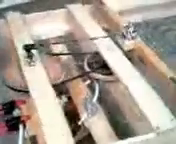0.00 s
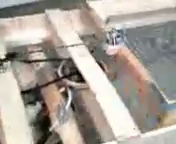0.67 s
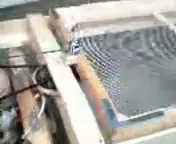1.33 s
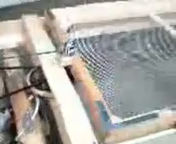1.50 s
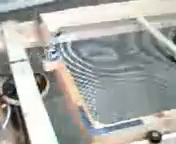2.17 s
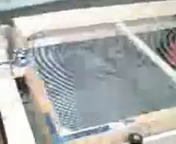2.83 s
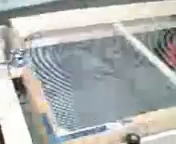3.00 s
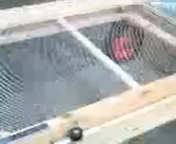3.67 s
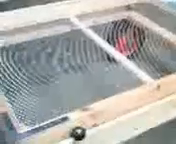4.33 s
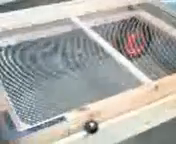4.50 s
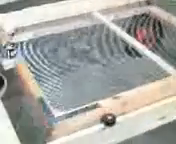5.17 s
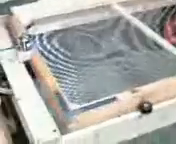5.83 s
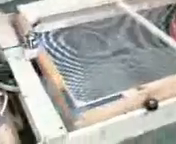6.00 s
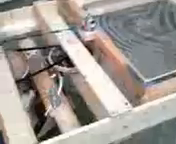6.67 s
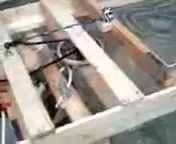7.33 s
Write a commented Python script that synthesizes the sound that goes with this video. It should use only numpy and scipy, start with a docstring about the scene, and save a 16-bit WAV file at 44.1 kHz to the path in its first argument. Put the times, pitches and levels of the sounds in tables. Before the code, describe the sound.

From the first moment, a loud motor drones close by outdoors, with a low, uneven throb that shakes a wooden frame. It drives a sieve tray back and forth at about four strokes a second. Each stroke combines a rumble of small wheels, a scrape along the rails and a rattle of wire mesh, followed immediately by a softer rebound. The drone comes back up in each tiny lull. The frame thumps now and then, most clearly around 0.3, 4.6, 5.7, 6.3 and 7 seconds. The tray clatters irregularly, notably near 1 second and between 3 and 4.4 seconds. It also catches on its rails in very short, squeaky judders, strongest near 1, 1.8, 3.8 and 5 to 5.5 seconds. Faint, bright clicks top some of the loudest strokes, though the overall treble is dull. The machine keeps its pace to the end, at about 7.4 seconds.

```python
"""A motor on a wooden frame outdoors cranks a soil sieve to and fro, four strokes a second.
From the start the motor drones through the frame, which shakes and now and then thumps.
On each stroke the tray rumbles on small wheels, scrapes its rails and rattles its wire mesh;
80 ms later it rebounds. At times it clatters, or sticks and judders on the rails. Faint, bright
clicks sound on some of the loudest peaks. In each lull the drone comes back up; it runs to the end."""
import sys
import numpy as np
from scipy import signal
from scipy.fft import rfft, irfft
from scipy.io import wavfile
from scipy.ndimage import uniform_filter1d, minimum_filter1d

SR = 44100
rng = np.random.default_rng(int(sys.argv[2]) if len(sys.argv) > 2 else 0)


def materialize(psi):
    """Save the field psi as 16-bit PCM at rate SR to the path in sys.argv[1].

    A 1-D psi becomes a single channel; in a 2-D psi each row is a channel.
    """
    bounded = np.clip(np.atleast_2d(psi).T, -1, 1)
    quanta = np.round(bounded * 32767).astype(np.int16)
    wavfile.write(sys.argv[1], SR, quanta)


N = 327663
TIME_S = np.arange(N) / SR

# frame shake spectrum: freq_hz, gain_db
SHAKE_SPECTRUM = [(15, -23), (30, -20.5), (60, -4), (100, -2.5), (170, 0.5), (240, 2), (400, 6), (700, -10),
                  (2000, -65)]
# wooden frame modes: freq_hz, width_hz, gain_db
FRAME_MODES = [(286, 120, -5), (340, 28, 5.5), (375.8, 29, -2.5)]
# harder knocks of the frame: peak_s, level_db
FRAME_THUMPS = [(.33, -16), (1.0, -19.5), (1.361, -16.5), (2.935, -20), (3.0, -19), (3.04, -23),
                (3.56, -18), (3.85, -16.5), (4.1, -17), (4.389, -17), (4.58, -15), (5.1, -19.5),
                (5.67, -15), (5.79, -20), (6.25, -13), (7.05, -14.5), (7.35, -18.5)]
# shaft speed: time_s, speed_hz
MOTOR_SPEED = [(0.0, 52.5), (0.06, 51.3), (0.99, 51.9), (2.69, 51.3), (2.96, 52.7), (3.02, 51.9),
               (4.51, 52.0), (4.63, 51.2), (5.03, 51.7), (6.58, 51.8), (6.66, 51.0), (6.81, 51.9),
               (7.08, 51.5), (7.43, 52.4)]
# motor's direct sound: time_s, nearness_db
MOTOR_NEARNESS = [(0, 0), (1.2, 3), (2.4, 1), (3.05, -2), (3.55, 0), (4.2, -4), (5.2, -2), (6.4, .5),
                  (7.43, 1)]
# motor hum: shaft_harmonic, level_db, nearness_db_per_db
HUM_PARTIALS = [(3, -28.5, 2.9), (4, -11.5, 2), (5, -4.5, 0.6), (6, -4, -0.5), (7, 2, 1.5), (8, -3, 1),
                (10, -11, 0.6), (11, -16.5, 1.5), (12, -16.5, 0.6)]
# pull and push in turn: peak_s, rumble_db, scrape_db, rattle_db, rebound_re_stroke_db
TRAY_STROKES = [(-0.005, -15, -13.5, -25, -32), (0.268, -16, -22, -34.5, -7.5),
                (0.491, -18, -19.5, -27, -3.5), (0.749, -13, -19, -30, -4.5),
                (0.969, -19.5, -17, -27, -11.5), (1.253, -12, -15, -26, -7.0),
                (1.464, -16, -16.0, -26, -13.5), (1.747, -19.5, -17.5, -32, -3.5),
                (1.957, -14.5, -16.5, -32, -8.5), (2.232, -14.5, -15.5, -26.5, -11.5),
                (2.454, -18, -16.5, -30.5, -14), (2.735, -15.5, -16.5, -31, -4),
                (2.962, -24, -18, -30, -16.5), (3.26, -17.5, -17, -30, -9.5), (3.475, -18.5, -16, -28, -20),
                (3.732, -21.5, -18.5, -30.5, -1), (3.965, -18.5, -19.5, -26, -11.5),
                (4.242, -18, -15, -25.5, -4), (4.46, -21, -18, -25, -11.5), (4.761, -15.5, -18, -27, -9),
                (4.98, -16, -13.5, -23, -10.5), (5.246, -18, -14, -25.5, -5.5),
                (5.449, -15.5, -15, -30, -20), (5.734, -16, -17.5, -27.5, -4),
                (5.944, -18.5, -16, -25.5, -9), (6.228, -14, -18, -27.5, -11), (6.442, -19.5, -26, -29, -8),
                (6.714, -16.5, -18, -29, -2), (6.92, -11, -17.5, -25, -11), (7.195, -16.5, -20, -29.5, -3),
                (7.439, -26.5, -14, -24, -9)]
# steady rolling under the strokes: rumble_db, scrape_db, rattle_db
ROLLING_LEVELS = (-21.5, -24.5, -34)
# nearness of the rolling tray: time_s, gain_db
ROLLING_NEARNESS = [(0, 0.5), (1.7, 0), (3.5, 1.7), (5.3, 1), (7.43, -0.5)]
# wheel rumble spectrum: freq_hz, gain_db
WHEEL_SPECTRUM = [(200, -27), (400, -5.5), (500, -4), (650, -4), (780, -2.5), (860, -1.5), (1000, -5),
                  (1150, -6.5), (1500, -30), (3000, -48.5)]
# rail and board spectrum: freq_hz, gain_db
RAIL_SPECTRUM = [(600, -28), (950, 2), (1150, 5.5), (1400, 5.5), (1650, 4), (2000, -2.5), (2400, -14),
                 (3200, -52)]
# wire mesh spectrum: freq_hz, gain_db
MESH_SPECTRUM = [(1500, -12.5), (2000, -3.5), (2250, 1), (2550, -2), (2850, -4), (3100, -2), (3350, -3),
                 (3520, -11.5), (3720, -14), (4050, -21), (4300, -23), (4550, -19), (4750, -32.5),
                 (5100, -43)]
# modes of the boards, metal corners and wires: freq_hz, gain_db
RING_MODES = [(560, -8), (640, -2.5), (735, -6.5), (850, -0.5), (915, -1), (1010, -0.5), (1105, -4.5),
              (1190, 0), (1310, -4), (1400, -2), (1510, -1.5), (1630, -2), (1790, -5), (1960, -9),
              (2130, 0), (2290, -0.5), (2470, 2.5), (2680, -2.5), (3350, -4), (3500, -7)]
# tray catching on its rails: start_s, level_db, pitch_hz, length_s
RAIL_JUDDERS = [(0.724, -11, 900, 0.018), (0.963, -9, 1065, 0.026), (1.217, -10.5, 976, 0.053),
                (1.753, -7.5, 977, 0.014), (2.228, -12.5, 855, 0.031), (2.709, -12, 1216, 0.028),
                (3.344, -12.5, 1397, 0.017), (3.352, -13.5, 1131, 0.056), (3.717, -10.5, 1360, 0.021),
                (3.79, -4.5, 1153, 0.011), (4.207, -15.5, 980, 0.037), (4.762, -21, 853, 0.012),
                (4.961, -9, 855, .045), (5.234, -7, 870, 0.041), (5.46, -6.5, 869, 0.016),
                (5.705, -16, 1334, 0.055), (6.204, -16, 1112, 0.048), (6.88, -11.5, 863, 0.029),
                (6.912, -20, 1110, 0.021), (7.41, -9, 1382, .04)]
# bursts of impacts in the tray: start_s, wood_db, wire_db, decay_s
TRAY_CLATTERS = [(.3, -18.5, -25, 0.032), (.49, -28.5, -31, .04), (0.746, -21, -27, 0.025),
                 (.962, -11.5, -20.5, 0.017), (1.258, -22, -25.5, 0.027), (1.452, -21, -25, 0.033),
                 (1.746, -14, -26, 0.02), (1.949, -18.5, -31, 0.024), (2.236, -23, -38, 0.017),
                 (2.8, -20, -23, .03), (2.945, -12, -31, .035), (3.185, -18.5, -26, 0.028),
                 (3.31, -11, -13.5, 0.016), (3.342, -15, -18, 0.032), (3.468, -12, -21, 0.016),
                 (3.605, -17.5, -28, 0.034), (3.82, -28, -17, 0.032), (3.955, -11.5, -39, 0.017),
                 (4.297, -16, -15.5, 0.027), (4.41, -18, -32, 0.025), (5.101, -23, -29, 0.017),
                 (5.4, -19.5, -31, 0.016), (5.72, -16.5, -35, 0.017), (6.207, -14.5, -30, 0.016),
                 (6.37, -19, -23, 0.017), (6.43, -15.5, -27, 0.02), (6.62, -18.5, -33, 0.029),
                 (6.881, -26, -42, 0.023), (7.195, -17, -26, 0.024)]
# faint clicks on some of the loudest peaks: start_s, impulse_db
PEAK_CLICKS = [(.806, -18.5), (0.983, -22.5), (1.275, -13), (1.756, -14), (2.245, -21.5), (3.483, -24),
               (4.246, -11), (4.771, -14), (4.988, -17), (5.237, -14), (5.436, -11), (5.722, -16.5),
               (6.209, -22), (6.938, -16)]


def from_db(db):
    """Decibels to gain."""
    return 10 ** (np.asarray(db) / 20)


def unit_rms(x):
    """Scale to rms 1."""
    return x / np.sqrt(np.mean(x ** 2) + 1e-20)


def curve(rows):
    """Breakpoints (time_s, value) at every sample."""
    return np.interp(TIME_S, *np.transpose(rows))


def drift(rate_hz):
    """Smooth random wander, rms 1."""
    step, settle = 40, 2000
    pole = np.exp(-2 * np.pi * rate_hz * step / SR)
    noise = rng.standard_normal(N // step + settle + 2)
    slow = signal.lfilter([1], [1, -2 * pole, pole * pole], noise)[settle:]
    return np.interp(np.arange(N) / step, np.arange(len(slow)), unit_rms(slow))


def swells(peak_s, level_db, rise_s, fall_s):
    """Summed gain of two-sided Gaussian swells."""
    coarse_s = TIME_S[::50]
    gap_s = coarse_s - peak_s[:, None]
    shapes = np.exp(-(gap_s / np.where(gap_s < 0, rise_s, fall_s)) ** 2)
    return np.interp(TIME_S, coarse_s, from_db(level_db) @ shapes)


def resonance(x, hz, width_hz):
    """Two-pole resonance, peak gain 1."""
    radius = np.exp(-np.pi * width_hz / SR)
    feedback = [1, -2 * radius * np.cos(2 * np.pi * hz / SR), radius ** 2]
    return signal.lfilter(np.array([1, 0, -1]) * (1 - radius ** 2) / 2, feedback, x + 1e-18)


def body(x, spectrum, size=8192):
    """Minimum-phase response of a body to x, rms 1."""
    hz, db = np.transpose(spectrum)
    bins_hz = np.arange(size // 2 + 1) * SR / size
    gain = from_db(np.interp(np.log(bins_hz + 1), np.log(hz), db))
    cepstrum = irfft(np.log(gain))
    cepstrum[1:size // 2] *= 2
    cepstrum[size // 2 + 1:] = 0
    impulse_response = irfft(np.exp(rfft(cepstrum)))
    return unit_rms(signal.fftconvolve(x, impulse_response)[:N])


def contacts(per_s, spread_db):
    """Tiny random impacts of uneven size."""
    sizes = from_db(spread_db * np.clip(rng.standard_normal(N), -2, 2)) * rng.choice([-1, 1], N)
    return sizes * (rng.random(N) < per_s / SR)


def peak_clicks():
    """Faint, bright clicks: band-passed impulses at listed times."""
    clicks = np.zeros(N)
    for start_s, db in PEAK_CLICKS:
        clicks[round(start_s * SR)] = from_db(db)
    return signal.sosfilt(signal.butter(1, [4500, 6500], "band", fs=SR, output="sos"), clicks + 1e-18)


def frame_shake(level_db):
    """Low, noisy shake of the whole frame."""
    return from_db(level_db) * body(rng.standard_normal(N), SHAKE_SPECTRUM)


def shaft_angle_rad():
    """Running angle of the motor shaft."""
    return 2 * np.pi * np.cumsum(curve(MOTOR_SPEED)) / SR


def motor_hum(level_db, waver_db, smear_rad):
    """One push a turn gives harmonics; the frame delays each differently."""
    angle_rad, near_db = shaft_angle_rad(), curve(MOTOR_NEARNESS)
    hum = 0
    for k, db, db_per_db in HUM_PARTIALS:
        gain = from_db(db + db_per_db * near_db + waver_db * drift(5))
        hum += gain * np.cos(k * angle_rad + smear_rad * k * k)
    return from_db(level_db) * unit_rms(hum)


def frame_knocks(level_db, waver_db, bunching):
    """Uneven motor knocks, bunched once a turn, ring the frame; some thump harder."""
    knocks = rng.standard_normal(N) * np.exp(bunching * np.cos(shaft_angle_rad() + 0.43))
    ringing = sum((-1) ** k * from_db(db) * resonance(knocks, hz, width_hz)
                  for k, (hz, width_hz, db) in enumerate(FRAME_MODES))
    ringing = resonance(ringing, hz=335, width_hz=340)
    ringing /= np.sqrt(uniform_filter1d(ringing ** 2, size=3500))  # even out the power
    thumps = swells(*np.transpose(FRAME_THUMPS), rise_s=0.015, fall_s=0.018)
    return np.hypot(from_db(level_db + waver_db * drift(11)), thumps) * ringing


def motor(throb_hz, throb_db):
    """Drone of hum and knocks; the loose drive makes it throb unevenly."""
    hum = motor_hum(level_db=-19.5, waver_db=2.5, smear_rad=0.2735)
    knocks = frame_knocks(level_db=-26, waver_db=2, bunching=0.21)
    throb = np.sin(2 * np.pi * np.cumsum(throb_hz + 3 * drift(4.3)) / SR)
    depth = np.clip(1 + 1.1 * drift(2.6), 0, 2)
    return (hum + knocks) * from_db(throb_db * depth * throb)


def clatters(wood_gain_db, wire_gain_db):
    """Bursts of impacts swell in 2 ms and die away in the boards and mesh."""
    wood, wire = np.zeros(N), np.zeros(N)
    for start_s, wood_db, wire_db, decay_s in TRAY_CLATTERS:
        burst = (TIME_S >= start_s) * np.exp(-np.abs(TIME_S - start_s) / decay_s)
        wood += from_db(wood_db + wood_gain_db) * burst
        wire += from_db(wire_db + wire_gain_db) * burst
    boards = body(contacts(per_s=2500, spread_db=2), RAIL_SPECTRUM)
    mesh = body(contacts(per_s=4000, spread_db=2), MESH_SPECTRUM)
    return uniform_filter1d(wood, size=90) * boards + uniform_filter1d(wire, size=90) * mesh


def judders(gain_db, wobble, rough_db):
    """Stick-slip rings the tray at an unsteady pitch. Returns sound and grip (0-1)."""
    tones, grip = np.zeros(N), np.zeros(N)
    pitch_ratio = 1 + wobble * drift(70)
    roughness = from_db(rough_db * drift(110))
    for start_s, db, pitch_hz, length_s in RAIL_JUDDERS:
        hold = np.interp(TIME_S - start_s, [0, 0.003, 0.75 * length_s, 1.1 * length_s], [0, 1, 1, 0])
        tones += from_db(db + gain_db) * hold * np.sin(2 * np.pi * np.cumsum(pitch_hz * pitch_ratio) / SR)
        grip = np.maximum(grip, hold)
    return tones * roughness, grip


def stroke_levels_db(rebound_delay_s=0.081):
    """Rumble, scrape and rattle levels: steady rolling plus each stroke and its rebound."""
    peak_s, *peaks_db, rebound_db = np.transpose(TRAY_STROKES)
    levels_db = []
    for peak_db, rolling_db in zip(peaks_db, ROLLING_LEVELS):
        stroke = swells(peak_s, peak_db, rise_s=0.037, fall_s=0.036)
        rebound = swells(peak_s + rebound_delay_s, peak_db + rebound_db, rise_s=0.038, fall_s=0.038)
        rolling = from_db(rolling_db + curve(ROLLING_NEARNESS))
        levels_db.append(20 * np.log10(np.hypot(stroke + rebound, rolling)))
    return levels_db


def tray_ringing(rumble_db, scrape_db, rattle_db, gain_db, patchy_db, width_ratio):
    """As the contact points move, now one mode rings out, now another."""
    out = 0
    for hz, db in RING_MODES:
        drive_db = rumble_db if hz < 1100 else scrape_db if hz < 2100 else rattle_db
        width_hz = width_ratio * hz
        mode = resonance(resonance(rng.standard_normal(N), hz, width_hz), hz, width_hz)
        wander_db = patchy_db * np.clip(drift(11), -2, 1.5)
        out += from_db(db + drive_db + gain_db + wander_db) * unit_rms(mode)
    return out


def tray(wheel_db, rail_db, mesh_db, jolt_db, buzz_db):
    """Wheels roll on rough wood; rails scrape and mesh chatters, jolting and buzzing with the shaft."""
    rumble_db, scrape_db, rattle_db = stroke_levels_db()
    flutter_db = jolt_db * drift(14) - buzz_db * np.cos(shaft_angle_rad())
    wheels = body(contacts(per_s=6000, spread_db=2), WHEEL_SPECTRUM)
    rails = body(contacts(per_s=3000, spread_db=5.5), RAIL_SPECTRUM)
    mesh = body(contacts(per_s=5000, spread_db=6), MESH_SPECTRUM)
    return (from_db(rumble_db + wheel_db) * wheels
            + from_db(scrape_db + rail_db + flutter_db) * rails
            + from_db(rattle_db + mesh_db + flutter_db) * mesh
            + tray_ringing(rumble_db, scrape_db, rattle_db, gain_db=-14, patchy_db=8, width_ratio=0.063))


def ducking(trigger, db_per_db):
    """Gain that dips while the trigger is loud and rises in its lulls."""
    loud_db = 10 * np.log10(uniform_filter1d(trigger ** 2, size=1300))
    return from_db(-db_per_db * (loud_db - loud_db.mean()))


def scene():
    """Motor, frame and sieve from close by, mono."""
    drone = motor(throb_hz=18.2, throb_db=2)
    shake = frame_shake(level_db=-24.5)
    sliding = tray(wheel_db=-1, rail_db=-2.5, mesh_db=-1, jolt_db=1.96, buzz_db=0.5)
    judder, grip = judders(gain_db=-2, wobble=0.0317, rough_db=4)
    sliding *= from_db(-3.5 * grip)  # a caught tray slides less freely
    sieve = sliding + judder + clatters(wood_gain_db=0.8, wire_gain_db=-3.5)
    return (drone * ducking(sieve, db_per_db=0.45) + shake + sieve)[None]


def limiter(x, ceiling):
    """The gain dips for a few ms around each peak above the ceiling."""
    allowed = np.minimum(1, ceiling / (np.abs(x) + 1e-9))
    return x * uniform_filter1d(minimum_filter1d(allowed, size=180), size=180)


def record(dry, treble_hz=4850, cutoff_hz=15800):
    """Small microphone: dull treble and limited peaks, with faint clicks added on top."""
    dull = signal.sosfilt(signal.ellip(10, 0.1, 80, treble_hz, fs=SR, output="sos"), dry)
    mix = limiter(dull, ceiling=0.96) + peak_clicks()
    return signal.sosfilt(signal.cheby2(12, 70, cutoff_hz, fs=SR, output="sos"), mix)


dry = scene()
out = record(dry)
materialize(out)
```